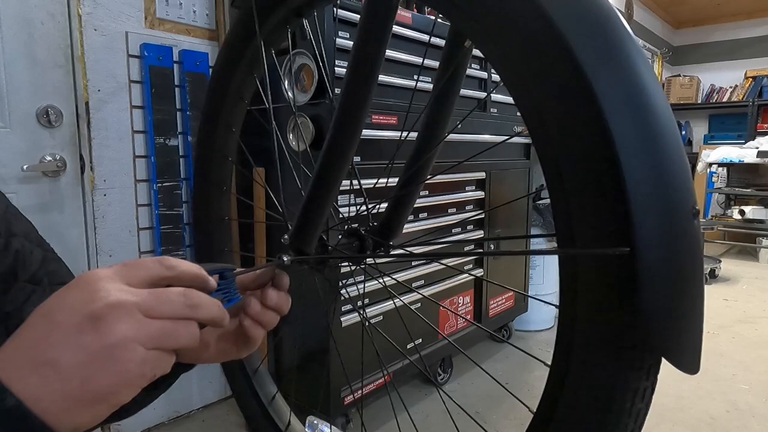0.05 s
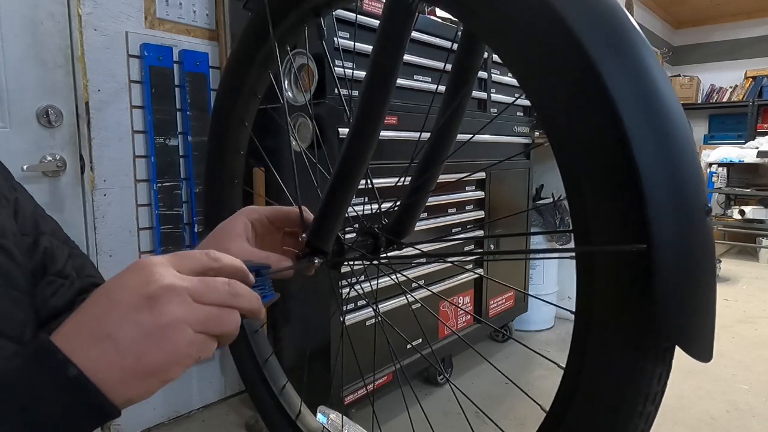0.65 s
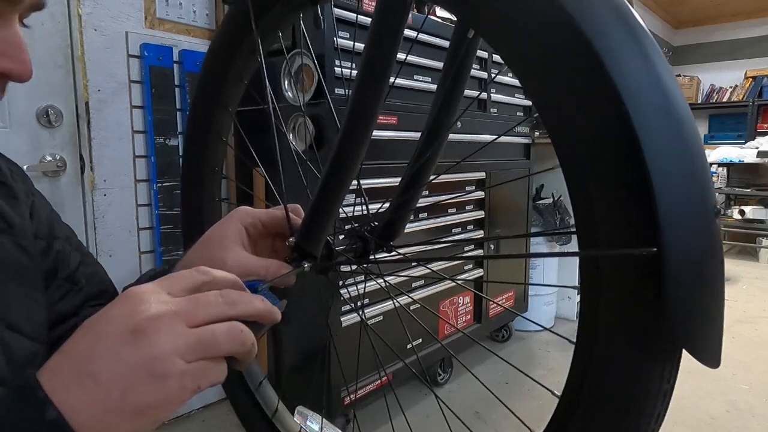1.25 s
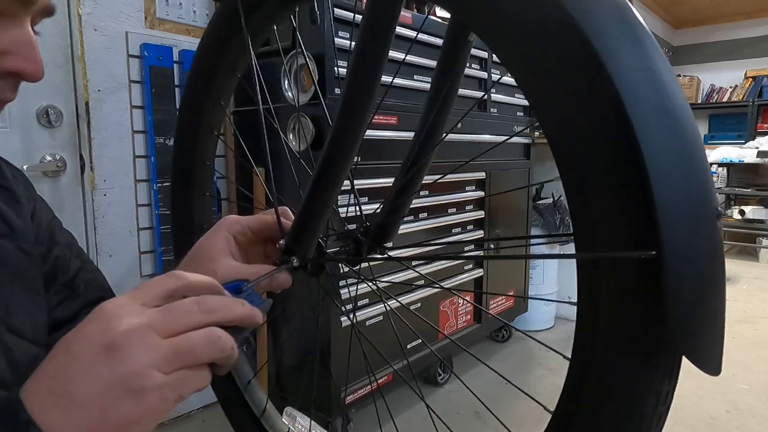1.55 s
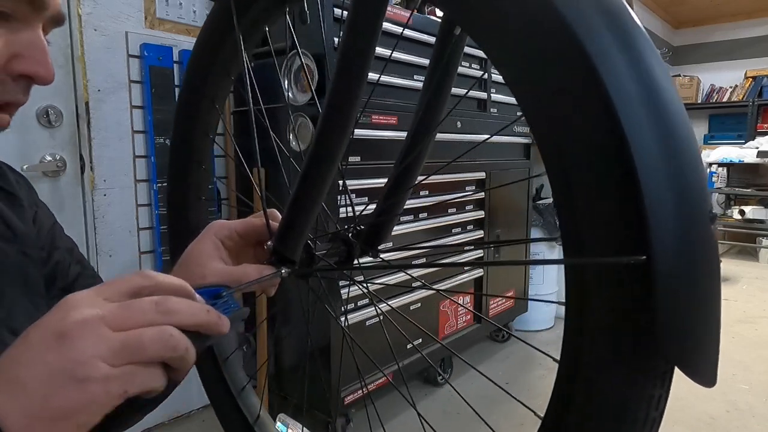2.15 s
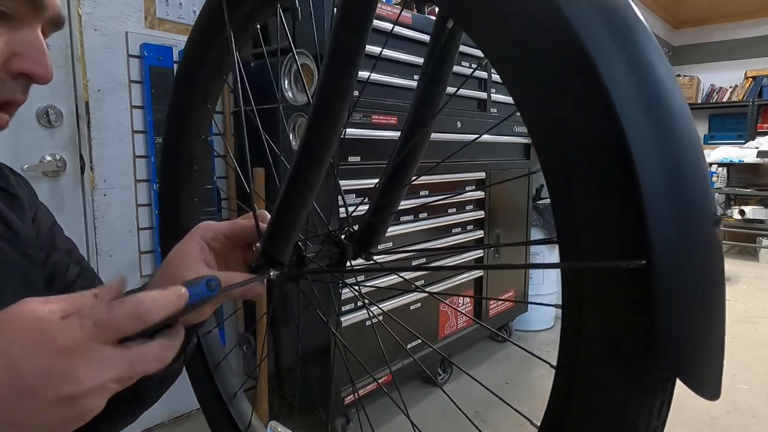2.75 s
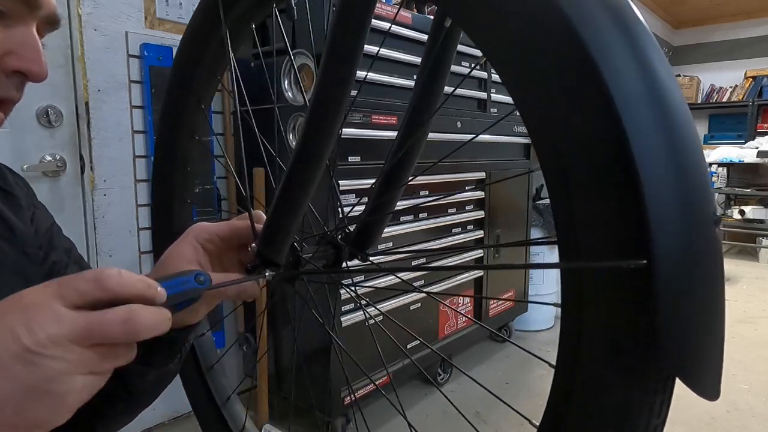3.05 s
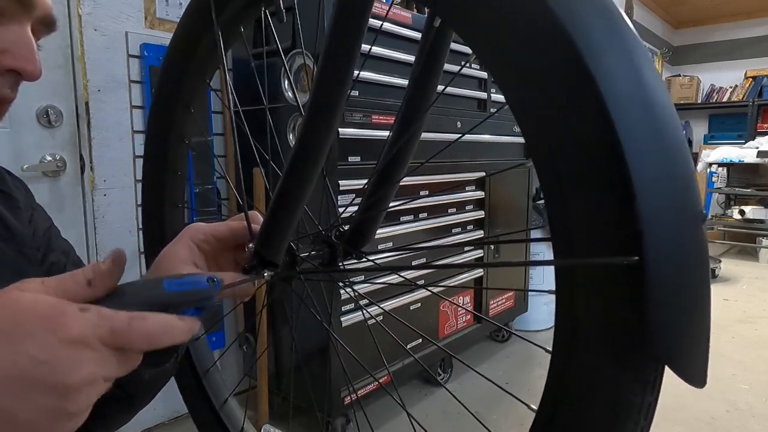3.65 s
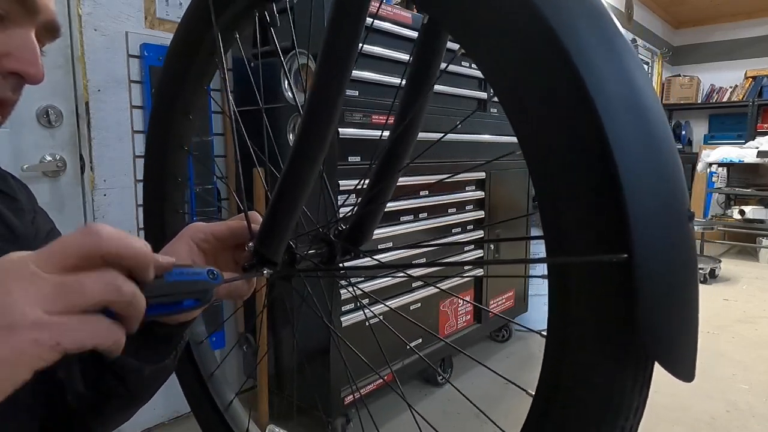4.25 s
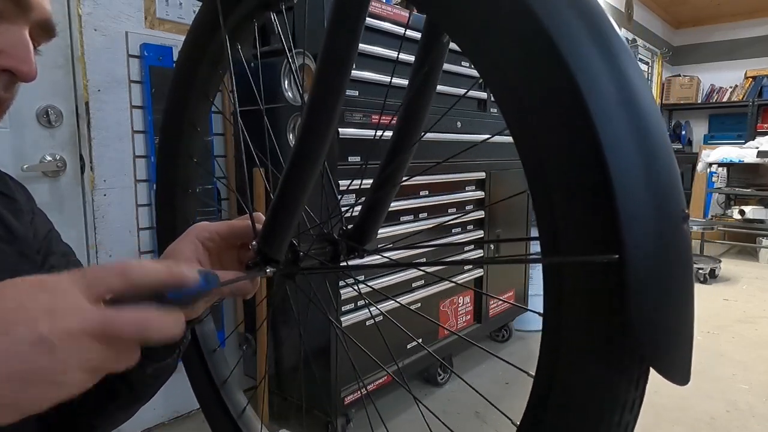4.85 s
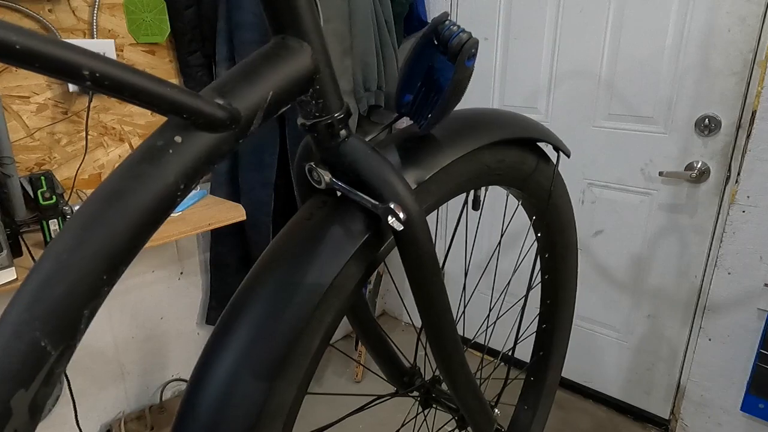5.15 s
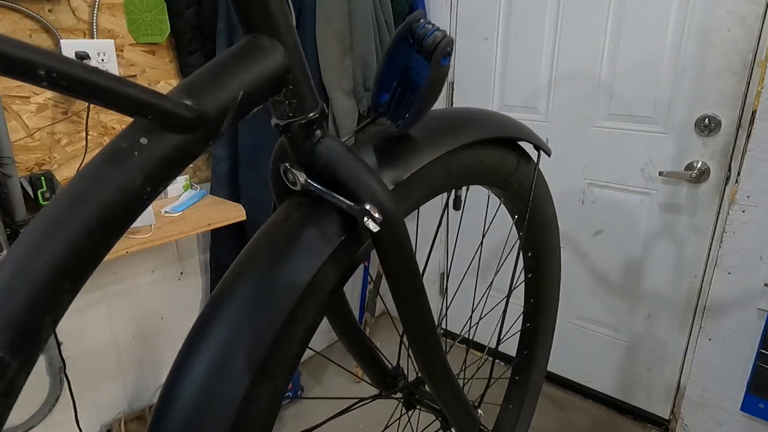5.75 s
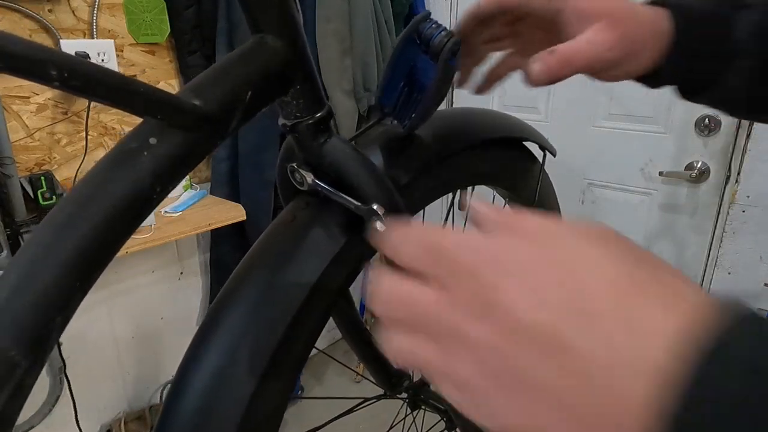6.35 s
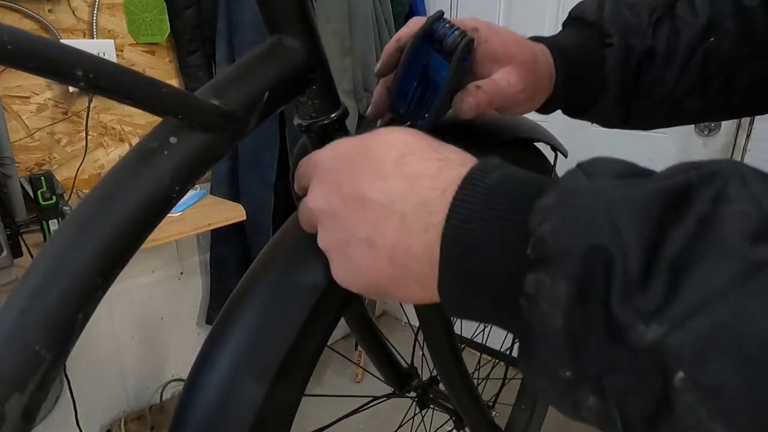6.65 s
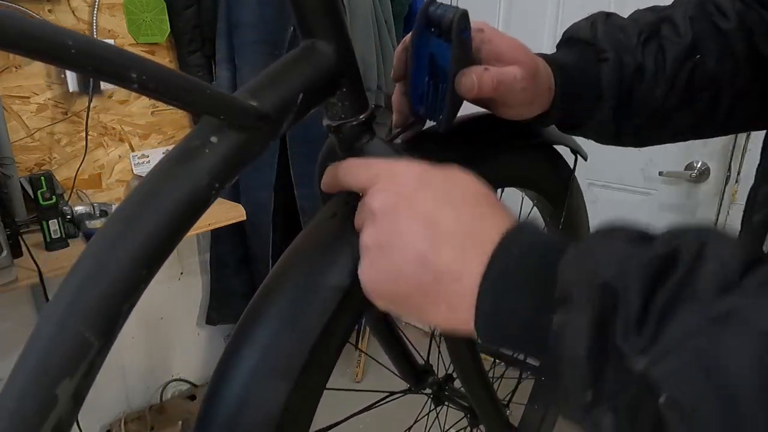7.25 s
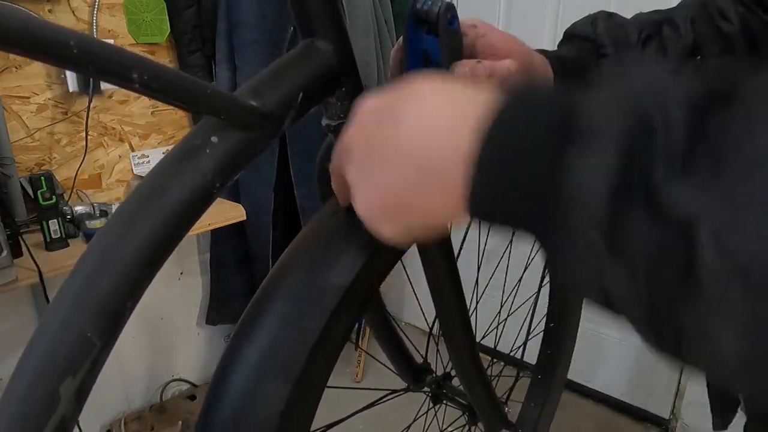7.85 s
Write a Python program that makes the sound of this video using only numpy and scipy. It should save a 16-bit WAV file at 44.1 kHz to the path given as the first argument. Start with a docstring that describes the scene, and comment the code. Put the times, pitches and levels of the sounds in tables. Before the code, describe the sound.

Close up in a quiet workshop, thin metal chatters and clacks against a bicycle fork, with one sharper ringing knock. Soft finger rubbing follows, and a hex tool ticks and rasps gently as it turns a bolt. The sound cuts out for a moment, then jacket cloth swishes while a spanner taps and lands on its nut in two clusters of bright clinks, each with a short room tail.

```python
"""A loose wire mudguard stay rattles on its bolt and knocks on a bicycle fork; then a folding hex tool
clicks and rubs at each turn. After a short silence, jacket sleeves rustle at the fork crown and a steel
spanner taps and clinks on its nut. Each hit is a noisy clack over ringing metal modes; thread, skin and
cloth are streams of tiny slips. A small workshop answers with a short tail over quiet room tone."""
import sys
import numpy as np
from scipy import signal
from scipy.fft import rfft, irfft, next_fast_len
from scipy.io import wavfile
from scipy.ndimage import uniform_filter1d, minimum_filter1d, map_coordinates

SR = 44100
rng = np.random.default_rng(int(sys.argv[2]) if len(sys.argv) > 2 else 0)


def write(x):
    x = np.atleast_2d(x).T
    wavfile.write(sys.argv[1], SR, np.round(np.clip(x, -1, 1) * 32767).astype(np.int16))


N = 348822
TAIL = np.arange(SR) / SR  # time axis of one decay

# Hits (t/s, level/dB, hardness/dB); all levels are relative, ahead of the layer gains
STAY_RATTLES = [(0.0, -24, -7), (0.095, -25, -5), (0.122, -24, -6), (0.15, -22, 5.5), (0.171, -19, -11),
                (0.18, -16.5, 4.5), (0.2, -26.5, 11.5), (0.208, -26.5, 10.5), (0.259, -19, 3),
                (0.276, -21.5, -4), (0.292, -35, -13), (0.488, -37.5, -1), (0.584, -38.5, -4),
                (0.676, -43, 3), (0.687, -30.5, -6), (0.719, -33.5, -0.5), (0.738, -39.5, -11)]
FORK_KNOCKS = [(0.865, -29.5, 2), (0.95, -28, -1.5), (1.5, -20.5, -1), (1.685, -24, -14),
               (1.695, -21.5, -11), (1.709, -12, 10.5), (1.717, -14.5, -10), (2.031, -36.5, -14)]
TOOL_CLICKS = [(2.686, -39, 9.5), (3.226, -40, 7.5), (3.952, -54, 18.5), (4.442, -50, 6),
               (4.564, -48.5, 18), (4.811, -25, 12)]
CROWN_TAPS = [(6.555, -32, -10), (6.757, -24.5, -25), (6.829, -20.5, 6), (7.293, -23.5, -2.5),
              (7.364, -26.5, 5.5), (7.377, -22, 3), (7.889, -33, 2)]
# Spanner landing on the nut (t/s, level/dB, chatter length/s)
NUT_CLINKS = [(6.9514, -17, 0), (6.986, -18.5, 0), (7.0242, -14, 0), (7.5299, -13.5, .05), (7.6003, -15, 0),
              (7.624, -16, 0)]
# Single modes left ringing by a hit (t/s, f/Hz, level/dB, t60/s)
LINGERING_MODES = [(0.0, 1412, -34, 0.21), (0.175, 1400, -31, 0.4), (1.5, 3230, -21, 0.06),
                   (1.5, 3560, -32, 0.097), (1.716, 157.4, -41.5, 0.64), (1.715, 234, -46, 0.58),
                   (1.715, 511, -42, 0.4), (2.689, 306, -47.5, 0.61), (4.812, 519, -39, 0.21),
                   (6.553, 2720, -23, 0.14)]
# Soft bumps on mudguard or tyre, and tiny close ticks (t/s, level/dB)
HAND_BUMPS = [(.553, -59), (0.902, -48), (2.381, -51), (3.116, -55), (3.25, -55), (4.762, -49),
              (4.822, -42), (5.55, -60), (5.616, -48), (6.339, -44), (6.599, -48), (7.364, -45),
              (7.855, -49)]
DRY_TICKS = [(5.7744, -18), (6.097, -21), (6.6, -23), (7.819, -21)]
# Friction strokes (t/s, length/s, level/dB, swell/dB)
BOLT_SEATING = [(.1, 0.056, -47.5, 0), (.16, 0.045, -33, -4), (.255, .04, -40, -11),
                (1.478, 0.017, -48.5, -4), (1.672, .015, -42, 1)]
FINGER_SLIDES = [(.35, 0.53, -54, -2), (1.05, 0.64, -59, -3), (2.32, 0.37, -60.5, -5),
                 (3.05, 0.2, -57.5, 7)]
BOLT_TURNS = [(2.7, 0.31, -50.5, -4.5), (3.31, 0.095, -53.5, 4), (3.575, 0.066, -52.5, -8),
              (3.65, 0.27, -49.5, -3), (4.14, 0.053, -52, -3), (4.28, 0.18, -54.5, 0),
              (4.58, 0.15, -44, 7.5), (4.73, 0.073, -31.5, 4), (4.95, 0.18, -59, -21),
              (5.05, 0.067, -44.5, -6)]
# Arms reaching in and working (t/s, length/s, level/dB, swell/dB, flap offset/dB)
ARM_MOVES = [(5.38, 0.15, -46, 4.5, -19), (5.504, 0.13, -42, 0.5, -17.5), (5.638, 0.13, -45, -1, -30),
             (5.759, .08, -41, -4.5, -11), (5.838, 0.41, -50, -12.5, -32), (6.132, 0.18, -42, -1, -12.5),
             (6.269, 0.091, -35.5, -2, -10.5), (6.362, 0.11, -33.5, 0.5, -18), (6.48, 0.021, -36, 4.5, -6),
             (6.512, 0.063, -28.5, 2, -10.5), (6.584, .13, -34.5, -4.5, -8.5), (6.745, 0.58, -45.5, 0, -25),
             (7.158, 0.083, -37.5, -14, -14.5), (7.27, 0.294, -44.5, -4.5, -10.5),
             (7.729, 0.15, -41, -3.5, -12)]
# A sleeve brushing past (t/s, level/dB, rise/s, t60/s)
SLEEVE_BRUSHES = [(6.083, -25.5, 0.017, 0.15)]

# Metal resonances; the tool's include the bolt (f/Hz, width/Hz, level/dB)
STAY_BODY = [(948, 140, -13.5), (1135, 47, -5.5), (1394, 12, -1.5), (1840, 86, 0.5), (2785, 23, -4),
             (2990, 91, -2.5), (3320, 25, -5.5), (3830, 81, -3.5), (4320, 28, -11), (4733, 99, -9.5),
             (5100, 65, -13), (5600, 35, -17), (6380, 44, -19), (7200, 34, -17)]
FORK_BODY = [(860, 60, -18), (1420, 63, -3), (1560, 35, -18.5), (1685, 33, 6.5), (1881, 47, 6.5),
             (2264, 13, -2), (2560, 18, -1.5), (2597, 33, 6.5), (2860, 32, -14.5), (2780, 45, -8.5),
             (3150, 46, -17), (3400, 160, -5.5), (3893, 60, -9.5), (4110, 32, -4), (4900, 50, -13),
             (5084, 130, -5.5), (5920, 38, -10)]
TOOL_BODY = [(1375, 39, -0.5), (1808, 52, 5), (2655, 15, 3.5), (2960, 49, -6.5), (3140, 30, 0.5),
             (3685, 80, -2.5), (3993, 110, -1.5), (4310, 41, -2), (4727, 48, 0), (5200, 24, -3),
             (6000, 18, -5), (6560, 140, -15.5), (6900, 65, -9), (7900, 35, -13)]
CROWN_BODY = [(1745, 37, 9.5), (2220, 57, 8), (2940, 26, -17), (3070, 31, -39), (3480, 11, 4.5),
              (3600, 35, 1), (4110, 250, 1.5), (4187, 110, 2), (5500, 55, -15), (6140, 11, -35)]
SPANNER_BODY = [(2250, 13, -10), (2400, 44, 0), (3005, 40, -1.5), (3400, 42, -22), (3510, 41, 1),
                (3760, 18, -1), (4200, 53, -5), (4420, 45, -5), (5320, 79, -7), (5900, 85, -17),
                (6050, 42, -12), (6500, 85, -27)]
# Slow shudder of mudguard and wheel (f/Hz, level/dB, t60/s)
MUDGUARD_MODES = [(157.3, -6, 0.2), (233, -14, 0.89), (281, -14.5, .5), (351.6, -8, 0.67),
                  (503, -3.5, 0.22), (780, -12, .6), (994, 6, 0.2)]
# Hit colours: mid clack, dull thud, bright edge, steel crash, top sparkle (f/Hz, level/dB)
CLACK_EQ = [(400, -36), (900, -8), (1400, 3.5), (1850, 5), (2300, 3.5), (3200, 4), (4300, -6.5),
            (5200, -20), (7500, -67.5)]
THUD_EQ = [(70, -15.5), (130, -20), (220, -6), (500, -2.5), (800, -8), (1300, -0.5), (2500, -49)]
EDGE_EQ = [(3000, -23.5), (4500, 2.5), (5300, 0), (6500, -7.5), (8200, -20.5), (9400, -27.5),
           (10600, -16.5), (12000, -31.5), (14000, -38)]
CHINK_EQ = [(200, -21.5), (900, -18.5), (1700, -5), (2400, 2.5), (3500, 4), (4300, -4), (4900, -0.5),
            (5800, 5), (7200, -7.5), (8800, -22), (11000, -50)]
SPARKLE_EQ = [(6000, -48), (8500, -8), (10100, 8.5), (11300, 1), (12200, -3), (14000, -19)]
# Texture colours: thread hiss, cloth swish, flapping folds, room tone (f/Hz, level/dB)
THREAD_EQ = [(100, -42.5), (330, -5), (700, -3), (1400, -1), (2700, 6), (4500, -1), (5600, -7), (7200, -13),
             (9000, -24), (10800, -15.5), (12500, -30.5), (14400, -39.5)]
SWISH_EQ = [(300, -14), (900, -9.5), (1600, 3.5), (2700, 3), (4500, 1), (6300, -4.5), (8200, -17.5),
            (9500, -27.5), (11200, -18.5), (12500, -34), (14000, -44.5)]
FLAP_EQ = [(60, -25), (110, -18), (170, -3.5), (300, 1), (600, 2), (1200, 6), (3000, -35)]
ROOM_TONE_EQ = [(12, -47), (20, -19), (91, -23.5), (116, -36.5), (145, -10.5), (245, -7), (591, -4),
                (660, -6.5), (1080, -8), (1240, -5), (1350, -6), (6490, -25), (9280, -48), (10900, -32.5),
                (14400, -52)]
# Workshop decay (f/Hz, t60/s)
ROOM_DECAY = [(150, 1), (500, 1), (1500, 0.86), (3500, 0.6), (6000, 0.63), (11000, 0.51)]
# Stereo side signal against the mid (f/Hz, level/dB)
SIDE_EQ = [(40, -17.5), (200, -39), (3000, -64.5), (6000, -38.5), (8500, -27.5), (11000, -14.5),
           (13000, -6.5)]
# Mute between the two jobs (t/s, gain)
MASTER_GATE = [(0, 1), (5.104, 1), (5.106, 0), (5.37, 0), (5.44, 1), (8, 1)]

TOP_HZ = 14300
BOLT_FADES_S, ARM_FADES_S = (.016, .024), (.035, .048)  # attack, release
CHATTER_GAP_S, CHATTER_FADE_DB_PER_S = .011, 75


def amp(db):
    """Decibels to gain."""
    return 10 ** (np.asarray(db) / 20)


def unit(x):
    """Scale to rms 1."""
    return x / np.sqrt(np.mean(x ** 2) + 1e-20)


def struck(x):
    """Scale a hit to rms 1 over its first 30 ms."""
    return x / np.sqrt(np.mean(x[:round(.03 * SR)] ** 2) + 1e-20)


def along(points, hz):
    """Read a curve on a log frequency axis."""
    freqs, values = np.transpose(points)
    return np.interp(np.log(hz + 1), np.log(freqs + 1), values)


def wobble(rate):
    """A smooth random curve, rate knots a second."""
    return map_coordinates(rng.standard_normal(int(N * rate / SR) + 4), [np.arange(N) * rate / SR])


def colour(x, eq, size=2048):
    """Minimum-phase EQ: nothing rings ahead of a transient."""
    cepstrum = irfft(np.log(amp(along(eq, np.fft.rfftfreq(size, 1 / SR)))))
    fold = np.r_[1, np.full(size // 2 - 1, 2), 1, np.zeros(size // 2 - 1)]
    return signal.oaconvolve(x, irfft(np.exp(rfft(cepstrum * fold))))[:len(x)]


def add(track, s, sound):
    """Mix a sound into the track at s seconds."""
    part = track[max(round(s * SR), 0):][:len(sound)]
    part += sound[:len(part)]


def burst(eq, t60):
    """Decaying noise: the thicket of short-lived modes set off by one hit."""
    t = TAIL[:SR // 4]
    return struck(colour(rng.standard_normal(len(t)) * amp(-60 * t / t60), eq))


def modes_of(resonances):
    """Modes (f/Hz, level/dB, t60/s): wider ones start stronger and die sooner; the hand damps them all."""
    hz, width, db = np.transpose(resonances)
    width = np.maximum(width, 17)
    return list(zip(hz, db + 20 * np.log10(width), np.log(1000) / (np.pi * width)))


def ring(modes, scatter_db):
    """Damped modes, rebalanced for each hit; outside their range the part radiates little."""
    t = TAIL[:SR // 2].astype(np.float32)
    hz, db, t60 = np.transpose(modes).astype(np.float32)[..., None]
    gains = amp(db[:, 0] + scatter_db * rng.standard_normal(len(db))) * rng.choice([-1, 1], len(db))
    sound = gains @ (np.sin(2 * np.pi * hz * t) * np.exp(-float(np.log(1000)) * t / t60))
    band = signal.butter(3, [.75 * hz.min(), min(1.2 * hz.max(), TOP_HZ)], "band", fs=SR, output="sos")
    return struck(signal.sosfilt(band, sound))


def thud(t60):
    """A dull push that sets mudguard and wheel shuddering."""
    out = amp(-10.5) * ring(MUDGUARD_MODES, scatter_db=3.5)
    add(out, 0, burst(THUD_EQ, t60))
    return out


def contacts(hits, body, clack_db, body_db, thud_db, tilt_db, t60, rise_s):
    """Clack, ring, thud and edge: a harder hit is snappier, brighter and thuds less."""
    out = np.zeros(N)
    for s, db, hardness in hits:
        db_per_octave = tilt_db + .35 * hardness
        modes = [(hz, level + db_per_octave * np.log2(hz), life) for hz, level, life in modes_of(body)]
        clack = amp(db + clack_db) * burst(CLACK_EQ, t60)
        metal = amp(db + body_db) * ring(modes, scatter_db=2)
        shudder = amp(thud_db + .65 * db - .3 * hardness) * thud(2.64 * t60)
        edge = amp(db - 22.5 + hardness) * burst(EDGE_EQ, .49 * t60)
        rise = rise_s * amp(-.32 * hardness)  # a sliding contact builds more slowly than a square blow
        attack = 1 - np.exp(-TAIL / rise)
        for layer in (clack, metal, shudder, edge):
            add(out, s, layer * attack[:len(layer)])
    return out


def stay_rattle():
    """The loose wire stay chatters on the bolt."""
    return contacts(STAY_RATTLES, STAY_BODY, clack_db=-16, body_db=-8.5, thud_db=-35.5,
                    tilt_db=0, t60=.15, rise_s=.004)


def hums():
    """One mode of stay, mudguard or wheel swells over a few cycles and lingers."""
    out = np.zeros(N)
    for s, hz, db, t60 in LINGERING_MODES:
        envelope = amp(db - 60 * TAIL / t60) * (1 - np.exp(-TAIL * hz / 3))
        add(out, s, envelope * np.sin(2 * np.pi * hz * TAIL))
    return out


def grains(rate, spread_db):
    """Tiny slips at random moments and of unequal size, rms 1."""
    slips = rng.random(N) < rate / SR
    return unit(slips * rng.standard_normal(N) * amp(spread_db * rng.standard_normal(N)))


def strokes(rows, attack_s, release_s):
    """Envelope of rubbing strokes: each swells or fades, and overlaps add in power."""
    t, power = np.arange(N) / SR, np.zeros(N)
    for s, length, db, swell_db in rows:
        gate = np.clip((t - s) / attack_s, 0, 1) * np.clip(1 - (t - s - length) / release_s, 0, 1)
        progress = np.clip((t - s) / length, 0, 1)
        power += (gate * amp(db + swell_db * (progress - .5))) ** 2
    return np.sqrt(power)


def bolt_rub(rows, body, hiss_db, song_db, tilt_db, grip_detune=.012):
    """The thread slips in fine grains that hiss and sing in the metal; each grip shifts the modes."""
    slips = grains(rate=6000, spread_db=2)
    hiss, out = unit(colour(slips, THREAD_EQ)), np.zeros(N)
    for row in rows:
        modes = [(hz * (1 + grip_detune * rng.standard_normal()), db + tilt_db * np.log2(hz), t60)
                 for hz, db, t60 in modes_of(body)]
        song = unit(signal.oaconvolve(slips, ring(modes, scatter_db=2.5))[:N])
        out += strokes([row], *BOLT_FADES_S) * (amp(hiss_db) * hiss + amp(song_db) * song)
    return out * amp(1.3 * wobble(45))


def fingers():
    """Skin slides on tool and stay with a faint dry hiss."""
    force = strokes(FINGER_SLIDES, *ARM_FADES_S) * amp(1.5 * wobble(30))
    slips = grains(rate=4600, spread_db=2.5)
    return amp(-5.5) * force * unit(colour(slips, THREAD_EQ))


def hand_bumps(soft_hz=902):
    """A hand only thuds: flesh excites little treble."""
    out = np.zeros(N)
    for s, db in HAND_BUMPS:
        add(out, s, amp(db) * thud(t60=.13))
    return signal.sosfilt(signal.butter(2, soft_hz, fs=SR, output="sos"), out)


def fork_knocks():
    """The stay knocks on the fork and rings it."""
    return contacts(FORK_KNOCKS, FORK_BODY, clack_db=-7.5, body_db=-7.5, thud_db=-27.5,
                    tilt_db=.8, t60=.095, rise_s=.0022)


def tool_clicks():
    """The hex tool shifts in the bolt head and both ring together."""
    return contacts(TOOL_CLICKS, TOOL_BODY, clack_db=-12, body_db=-2.5, thud_db=-22,
                    tilt_db=-2.5, t60=.14, rise_s=.0028)


def sleeves():
    """Jacket cloth swishes on itself while its folds flap; a quick brush does both."""
    swish = strokes([row[:-1] for row in ARM_MOVES], *ARM_FADES_S)
    flap_moves = [(s, length, db + offset, swell) for s, length, db, swell, offset in ARM_MOVES]
    flap = strokes(flap_moves, *ARM_FADES_S)
    for s, db, rise, t60 in SLEEVE_BRUSHES:
        brush = struck(amp(-60 * TAIL / t60) * (1 - np.exp(-TAIL / rise)))
        add(swish, s, amp(db - 3) * brush)
        add(flap, s, amp(db - 15.5) * brush)
    fibres = unit(colour(grains(rate=10000, spread_db=1.5), SWISH_EQ))
    folds = unit(colour(grains(rate=1500, spread_db=3), FLAP_EQ)) * amp(2.2 * wobble(30))
    return amp(-2) * swish * fibres * amp(1.1 * wobble(29)) + flap * folds


def ticks():
    """Tiny close ticks, each a single spike that rings nothing."""
    out = np.zeros(N)
    spike = colour(signal.unit_impulse(SR // 50), CLACK_EQ)
    for s, db in DRY_TICKS:
        add(out, s, amp(db) * spike / np.abs(spike).max())
    return out


def crown_taps():
    """The held spanner taps the fork crown: a bright ring with hardly any thud."""
    return contacts(CROWN_TAPS, CROWN_BODY, clack_db=-12.5, body_db=-8, thud_db=-60,
                    tilt_db=5, t60=.17, rise_s=.0016)


def spanner_clinks(skid_s=.001):
    """Steel on steel: a bright crash over the spanner's own ring; a loose hit rebounds in a chatter."""
    out, steel = np.zeros(N), modes_of(SPANNER_BODY)
    attack = 1 - np.exp(-TAIL / skid_s)  # the spanner skids a little as it lands
    for start, level_db, chatter_s in NUT_CLINKS:
        for delay in CHATTER_GAP_S * np.arange(1 + int(chatter_s / CHATTER_GAP_S)):
            s = start + delay * rng.normal(1, .05)
            db = level_db - CHATTER_FADE_DB_PER_S * delay
            crash = amp(db - 12.5) * burst(CHINK_EQ, t60=.27)
            metal = amp(db - 7) * ring(steel, scatter_db=1.5)
            sparkle = amp(db - 24) * burst(SPARKLE_EQ, t60=.1)
            for layer in (crash, metal, sparkle):
                add(out, s, layer * attack[:len(layer)])
    return out


def workshop(x, wet_db, sections=16):
    """Add the room's tail, treble dying first; a fresh tail per section stands for the moving hands."""
    wet = np.zeros(N)
    for section in np.array_split(np.arange(N), sections):
        hz, t, noise = signal.stft(rng.standard_normal(SR), SR, nperseg=256)
        decay = amp(-60 * t / along(ROOM_DECAY, hz)[:, None])
        tail = signal.istft(noise * decay, SR, nperseg=256)[1][:SR]
        tail *= 1 - np.exp(-TAIL / .0014)  # reflections build up
        add(wet, section[0] / SR, signal.fftconvolve(x[section], tail / np.linalg.norm(tail)))
    return x + amp(wet_db) * wet


def scene():
    """Two jobs on the bicycle over room tone; only the top treble and the bass have any width."""
    axle = stay_rattle() + fork_knocks() + tool_clicks()
    axle += bolt_rub(BOLT_SEATING, STAY_BODY, hiss_db=-11, song_db=2, tilt_db=-1.5)
    axle += bolt_rub(BOLT_TURNS, TOOL_BODY, hiss_db=-3, song_db=-6, tilt_db=1.5)
    axle += hums() + fingers() + hand_bumps()
    crown = crown_taps() + spanner_clinks() + sleeves()
    work = workshop(axle, wet_db=-9) + workshop(crown, wet_db=-10) + ticks()
    low_cut = signal.butter(4, 140, "high", fs=SR, output="sos")  # the deep bass below about 140 Hz is cut away
    room_tone = amp(-58.5) * unit(colour(rng.standard_normal(N), ROOM_TONE_EQ))
    mid = signal.sosfilt(low_cut, work) + room_tone
    diffuser = rng.standard_normal(SR // 40)
    side = colour(signal.oaconvolve(mid, diffuser / np.linalg.norm(diffuser))[:N], SIDE_EQ)
    return np.array([mid + side, mid - side])


def limiter(x, ceiling=.89):
    """The gain ducks for a few milliseconds around any peak above the ceiling."""
    gain = ceiling / np.maximum(np.abs(x).max(axis=0), ceiling)
    return x * uniform_filter1d(minimum_filter1d(gain, size=SR // 200), size=SR // 200)


def record(dry):
    """Master chain: limiter, a mute between the two jobs, a narrow treble notch and a steep high cut."""
    gate = np.interp(np.arange(N) / SR, *np.transpose(MASTER_GATE))
    size = next_fast_len(N + SR // 4)
    hz = np.fft.rfftfreq(size, 1 / SR)
    notch = amp(-22 * np.exp(-((hz - 9050) / 170) ** 2))
    high_cut = 1 / np.sqrt(1 + (hz / TOP_HZ) ** 240)
    return irfft(rfft(gate * limiter(dry), size) * notch * high_cut, size)[:, :N]


dry = scene()
out = record(dry)
write(out)
```